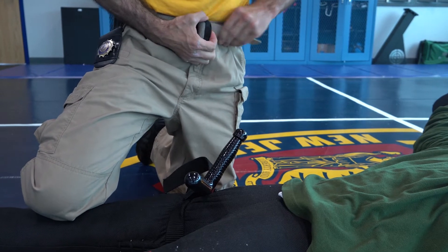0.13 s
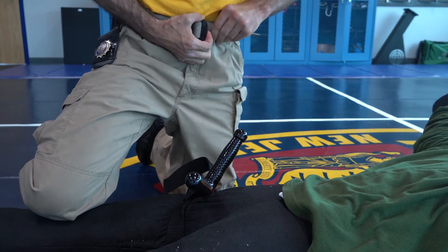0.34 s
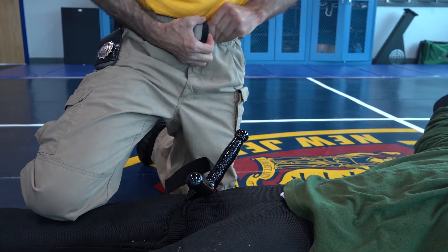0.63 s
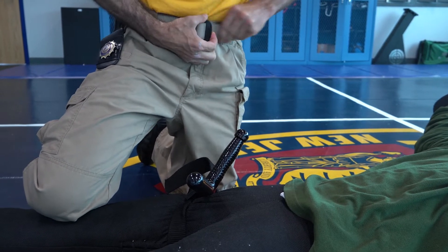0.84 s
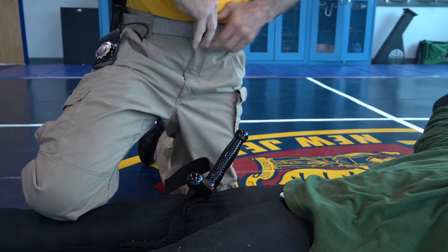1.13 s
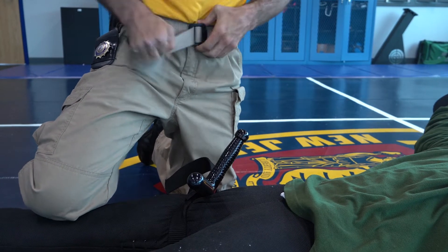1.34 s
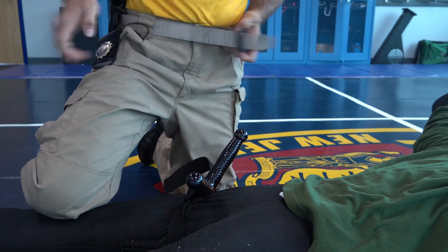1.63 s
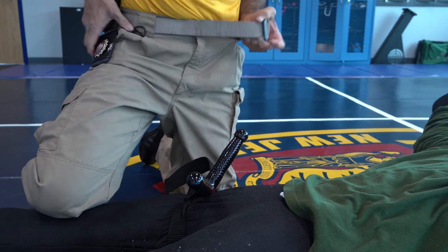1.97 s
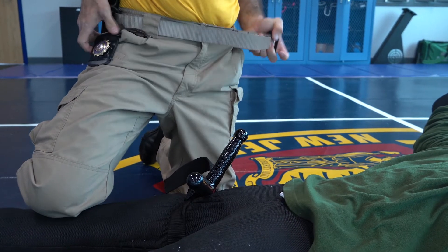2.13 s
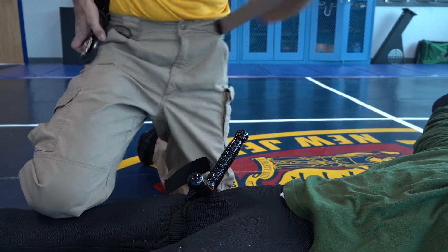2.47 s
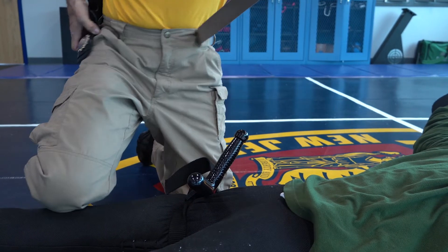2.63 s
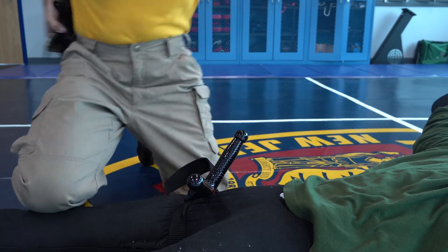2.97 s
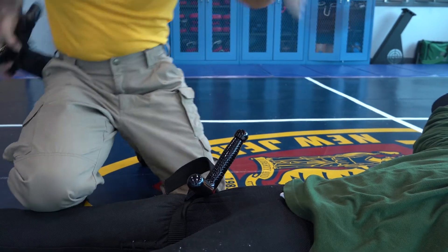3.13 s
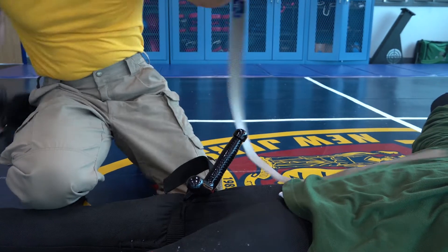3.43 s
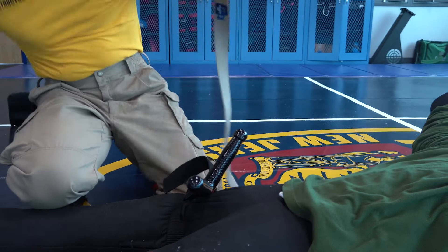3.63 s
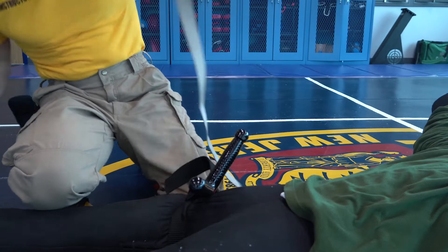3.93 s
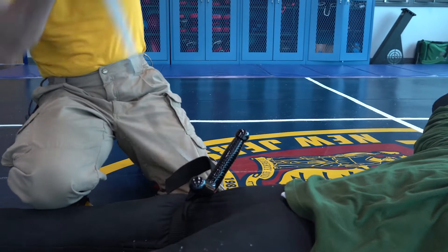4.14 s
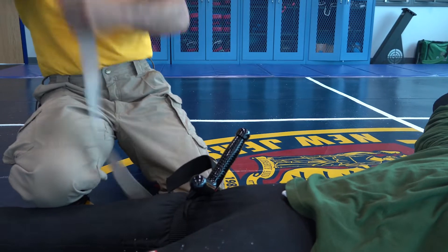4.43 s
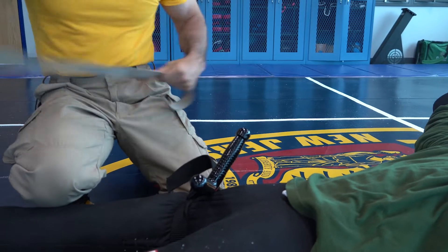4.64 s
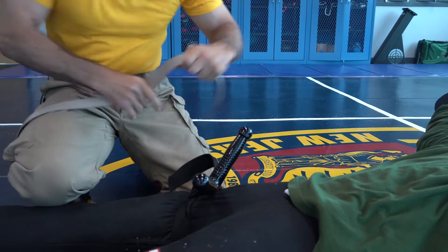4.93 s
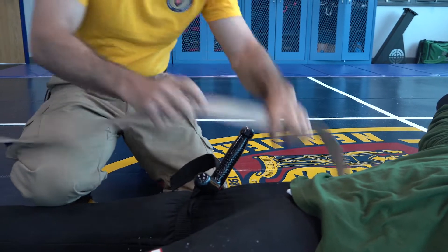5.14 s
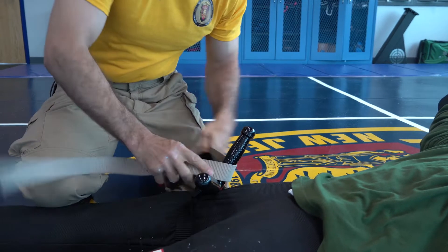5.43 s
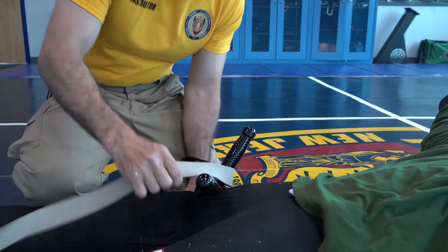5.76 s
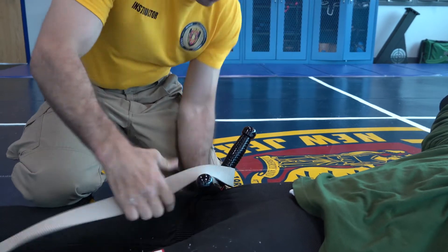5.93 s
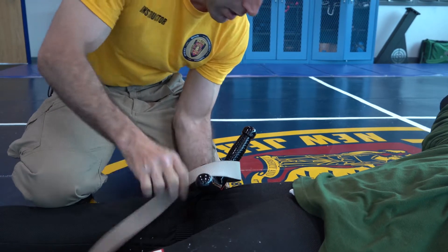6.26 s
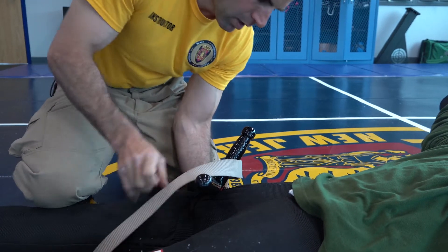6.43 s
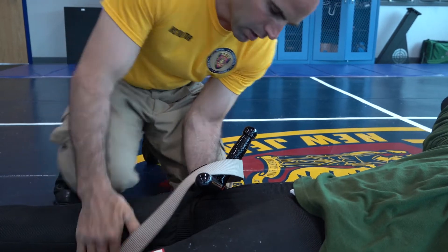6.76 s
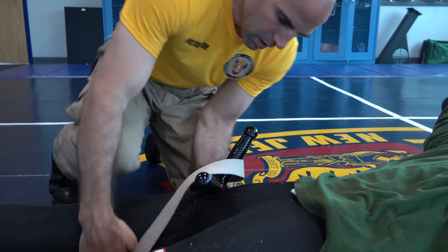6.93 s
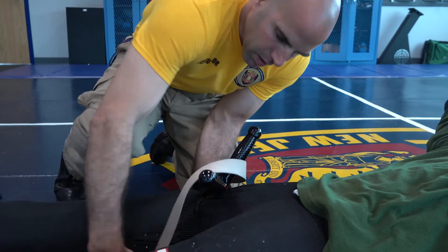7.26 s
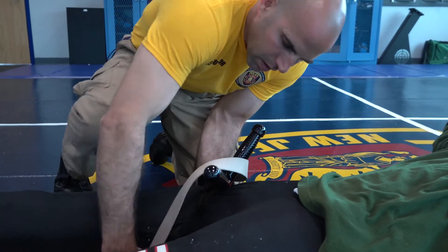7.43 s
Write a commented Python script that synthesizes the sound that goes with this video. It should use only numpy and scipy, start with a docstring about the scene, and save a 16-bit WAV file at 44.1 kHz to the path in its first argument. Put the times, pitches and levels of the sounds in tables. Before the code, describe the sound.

In a hall with a quiet ventilation rumble, clothing rustles and a latch clicks open, heard from close by. A webbing belt zips out through trouser loops in one fast, rasping pull, the loudest moment, and its tip briefly stutters. The loose strap and buckle then tap and slap at uneven intervals, while fabric brushes and scuffs as the belt is laid over a leg.

```python
"""Belt pulled off in a large hall

One microphone, close to a kneeling person who unbuckles a ribbed webbing belt, whips it out through
the trouser loops and lays it over a leg. Ribs pluck the loops and buzz; cloth fibres catch and let go
in rustles and scuffs; buckle and strap tick and slap. From farther off come a short, faint echo
and the rumble of the ventilation."""
import sys
import numpy as np
from scipy import signal
from scipy.fft import rfft, irfft
from scipy.io import wavfile

SR = 44100
rng = np.random.default_rng(int(sys.argv[2]) if len(sys.argv) > 2 else 0)


def store_wav(level_fs):
    """Save 16-bit WAV to argv[1]."""
    pcm = np.round(np.clip(np.atleast_2d(level_fs), -1, 1) * 32767)
    wavfile.write(sys.argv[1], SR, pcm.T.astype(np.int16))


N = 334851

# the belt running through the loops: t/s, rib rate/Hz, level/dB
BELT_RUN = [(2.32, 430, -42), (2.345, 470, -24), (2.37, 590, -16.5), (2.388, 700, -16), (2.41, 590, -19),
            (2.42, 750, -22), (2.436, 650, -20), (2.452, 705, -19), (2.475, 712, -19), (2.488, 630, -15),
            (2.507, 770, -28), (2.54, 775, -36)]
# the loose end following, slowing down: t/s, rib rate/Hz, level/dB
LOOSE_END = [(2.54, 1070, -29), (2.58, 1040, -31), (2.62, 910, -32), (2.71, 860, -39)]
# a thinner whine where the strap runs faster over a hip loop: t/s, rib rate/Hz, level/dB
HIP_WHINE = [(2.31, 1000, -34), (2.345, 1500, -30), (2.4, 2200, -35)]
# harmonics of the belt's buzz: multiple, relative level/dB
RIB_HARMONICS = [(1, 2), (2, -2), (3, -10.5), (4, -17), (5, -11)]
# harmonics of the loose end's buzz: multiple, relative level/dB
LOOSE_END_HARMONICS = [(1, -3), (2, -5.5), (3, -3), (4, -18.5)]

# ticks and slaps of buckle and strap: t/s, peak level/dB, body f/Hz, relative snap level/dB
TICKS = [(0.066, -17, 2400, 11), (0.263, -29.5, 1400, 3), (0.8572, -16, 705, 7), (0.8655, -15.5, 1400, -12),
         (0.8766, -27, 1570, -24), (1.2544, -5, 760, -1), (1.3003, -3.5, 1700, 9), (1.353, -13, 770, 3.5),
         (1.583, -18, 527, 2.5), (1.6248, -22.5, 583, -18), (1.638, -14.5, 2830, -5),
         (1.6422, -13.5, 2770, -19), (1.675, -13, 3360, -8), (1.6817, -14, 1630, -28),
         (1.7667, -19.5, 1180, -36), (1.781, -19, 1220, -2), (2.01, -21.5, 1590, -8),
         (2.2487, -19.5, 1320, -5), (2.4375, 3, 635, 1.5), (2.534, -5, 1110, -24), (2.6915, -10, 714, 0),
         (3.221, -22.5, 556, 0), (3.294, -27, 1320, -6), (3.4178, -15.5, 236, -16), (3.4287, -14.5, 453, 1),
         (3.539, -24, 2170, -20), (3.6766, -5, 9600, -17), (3.6793, -16, 222, -30),
         (3.6843, -1.5, 940, 8.5), (3.7098, -10, 8000, -10), (3.7229, -8.5, 865, -7),
         (3.7275, -5.5, 5300, 15), (3.867, -20, 3000, 9), (4.1767, -21, 2500, -13),
         (4.2118, -17.5, 2150, -3), (4.233, -7, 1550, -22), (4.235, 0, 1300, -14), (4.379, -18, 3000, -25),
         (4.7135, -13.5, 730, -1), (4.86, -8, 2860, -30), (4.8602, -9.5, 680, -26), (5.3058, -4.5, 1630, 1),
         (5.3076, -18, 1600, -4), (5.5513, -5.5, 434, 0.5), (5.8987, -15.5, 480, -1),
         (5.9165, -22, 3180, -19), (5.9402, -22, 3400, -15), (6.0313, -8.5, 940, -21),
         (6.0994, -21.5, 1050, -15), (6.1587, -26.5, 3560, 1), (6.2359, -11, 730, -16),
         (6.2898, -4.5, 373, -7), (6.301, -12, 685, -24), (6.519, -22.5, 920, -2),
         (6.878, -18.5, 890, -3.5), (6.901, -23, 3000, -6), (6.947, -19, 1990, -21),
         (6.913, -19, 1800, -15), (6.976, -9, 1230, -5), (7.166, -25.5, 696, -17), (7.186, -27, 1390, -7)]
BODY_WIDTH_HZ, BODY_WIDTH_SHARE = 190, .16   # a tick's bandwidth: a base plus a share of its pitch
# the stiff tip stuttering over a seam, in two runs: t/s, relative level/dB
TIP_SLIPS = [(2.051, -6), (2.0578, 3.5), (2.077, -6), (2.0849, 0), (2.088, 4), (2.098, -14), (2.109, -2),
             (2.128, -7), (2.146, -0.5), (2.8072, 0), (2.8176, -2), (2.8285, 0), (2.8386, 1), (2.848, 2),
             (2.8608, 1.5), (2.8772, 1)]
# modes of the belt tip: f/Hz, level/dB, T60/s
TIP_MODES = [(217, -28.5, 0.087), (322, -29, 0.019), (1610, -35.5, 0.05)]
SCRATCH_DB, SCRATCH_DECAY_S, SCRATCH_BAND_HZ = -30, 0.0037, (700, 3000)
# the latch rattling as it lets go: t/s, relative level/dB
LATCH_HITS = [(1.2243, -4), (1.2272, -3), (1.2803, -3), (1.2838, -2), (1.2872, 1), (1.2907, 4)]
# modes of the latch: f/Hz, level/dB, T60/s
LATCH_MODES = [(1100, -11, .016), (2700, -9, .007), (4600, -10, .005)]
# faint pings of the loose buckle: t/s, relative level/dB
BUCKLE_PINGS = [(1.803, 2), (1.827, 4), (1.891, -1), (3.57, 3)]
# modes of the buckle: f/Hz, level/dB, T60/s
BUCKLE_MODES = [(10300, -44, .03), (11050, -43, .035), (14900, -46, .04)]

# spectrum of the coarse weave's rasp: f/Hz, relative level/dB
RASP_SPECTRUM = [(480, -1), (900, -1), (1200, 1.5), (1480, 0), (1640, 4.5), (1800, -8)]
# spectrum of the strap's swish: f/Hz, relative level/dB
SWISH_SPECTRUM = [(1900, -10), (2500, -4.5), (3200, -6.5), (3900, -4.5), (4900, -12)]
# spectrum of the fine fibres' hiss: f/Hz, relative level/dB
HISS_SPECTRUM = [(5300, -5.5), (5800, -2.5), (7000, -7), (8000, -4), (9900, -4), (13000, -11),
                 (15300, -11.5)]
# spectrum of the heavy folds: f/Hz, relative level/dB
FOLD_SPECTRUM = [(110, -9.5), (200, -7), (340, -11.5), (600, -12.5)]
# cloth that never rests: t/s, rasp level/dB
FIDGET = [(0, -56.5), (.65, -63), (1.0, -54.5), (1.9, -49.5), (2.22, -56.5), (2.75, -43), (3.1, -54),
          (3.6, -47.5), (4.15, -54), (4.3, -46.5), (5.0, -48.5), (5.25, -54), (5.9, -55), (6.48, -57),
          (6.8, -44), (7.2, -56), (7.59, -42)]
# the belt's drag on the cloth as it is drawn: t/s, rasp level/dB
DRAG = [(2.27, -49), (2.345, -25.5), (2.5, -25), (2.56, -29.5), (2.64, -35), (2.7, -38), (2.85, -78)]
FIDGET_SWISH_DB, FIDGET_HISS_DB, DRAG_SWISH_DB, DRAG_HISS_DB = -1.5, -2.5, -3, -6.5   # re rasp
# long soft strokes of strap and sleeve: loudest t/s, rise/s, fade/s, rasp/dB, swish/dB, hiss/dB
STROKES = [(1.562, 0.041, 0.078, -49, -43, -43.5), (1.808, 0.14, 0.02, -42, -43.5, -54),
           (3.691, 0.0067, 0.21, -37.5, -40, -31.5), (4.33, 0.078, 0.14, -56, -49, -57),
           (4.54, 0.19, 0.19, -47, -37, -43), (4.802, 0.015, 0.2, -68, -47, -46),
           (4.9, .04, 0.21, -46.5, -50, -64), (5.15, 0.17, 0.1, -47, -44, -42.5),
           (5.738, 0.26, 0.2, -39.5, -48, -50.5), (6.022, 0.048, 0.26, -46, -50.5, -51.5),
           (6.682, 0.18, 0.19, -39.5, -42, -37), (6.99, 0.17, 0.27, -39, -40.5, -43.5),
           (7.38, 0.22, 0.22, -43, -49.5, -50.5)]
# short scuffs and creaks of strap on cloth: t/s, length/s, rasp/dB, swish/dB, folds/dB
SCUFFS = [(0.059, 0.029, -43, -58, -72), (0.501, 0.031, -43, -48.5, -65), (0.867, 0.04, -28, -36, -44),
          (1.21, 0.088, -28, -30.5, -44), (1.616, 0.079, -35.5, -47.5, -46.5),
          (2.058, 0.093, -40.5, -48.5, -33), (2.655, 0.0069, -25, -33.5, -32.5),
          (3.216, 0.014, -42, -49, -33), (3.349, 0.011, -46, -54, -34.5),
          (3.416, 0.0088, -29, -37.5, -21.5), (3.532, 0.0072, -41, -46, -30),
          (3.668, 0.086, -35, -40, -35.5), (4.228, 0.038, -38, -35.5, -38), (4.434, 0.0073, -54, -60, -32),
          (4.855, 0.048, -38, -42, -36), (5.135, 0.032, -57, -50, -35.5), (5.19, 0.0091, -67, -52, -36.5),
          (5.296, 0.028, -60, -44, -28.5), (5.426, 0.004, -37, -39.5, -42),
          (5.495, 0.0068, -42, -39.5, -60), (5.546, 0.014, -42, -40, -22.5),
          (5.894, 0.043, -40.5, -50, -34.5), (6.286, 0.013, -35, -31, -30.5),
          (6.554, 0.018, -33.5, -34, -33.5)]
SCUFF_RISE_S, SCUFF_FALL_S, SCUFF_HISS_DB = 0.0057, 0.011, -5.5   # hiss re swish
SETTLE_DB, SETTLE_LENGTHS = -15, 3.3   # cloth settling: level, time constant in scuff lengths

# spectrum of the ventilation's broad hush: f/Hz, relative level/dB
HUSH_SPECTRUM = [(105, -12), (130, 5.5), (185, 4.5), (260, 3), (292, -3), (1600, -16.5), (10000, -49),
                 (13800, -46)]
# spectrum of its deep rumble: f/Hz, relative level/dB
RUMBLE_SPECTRUM = [(6, 9), (18, 6), (30, -8), (46, 0), (57, -5), (70, 0), (80, -10), (98, -20)]
# spectrum of the thrum, two low hall resonances: f/Hz, relative level/dB
THRUM_SPECTRUM = [(40, -16), (47, 0), (57, -14), (69, -1), (80, -20)]
# swells of the thrum: loudest t/s, rise/s, fade/s, level/dB
THRUM_SWELLS = [(4.44, 0.058, 0.17, -41), (4.76, 0.11, 0.75, -27), (5.22, 0.061, 0.1, -31),
                (6.18, 0.063, 0.2, -32.5)]
# a faint, brief tone in the hall air: loudest t/s, rise/s, fade/s, f/Hz, level/dB
HUM = (0.4, 0, 0.2, 189, -38.5)
HUSH_DB, RUMBLE_DB, RUMBLE_WANDER_DB = -46.5, -36, 2
HALL_T60_S, HALL_DB, WALL_CUT_HZ = .3, -19, 6000
CUTOFF_HZ = 15750


def belt_pull():
    """Close to the microphone the belt buzzes out through the loops, its loose end trailing."""
    run = rib_buzz(BELT_RUN, RIB_HARMONICS)
    loose_end = rib_buzz(LOOSE_END, LOOSE_END_HARMONICS)
    return run + loose_end + rib_buzz(HIP_WHINE, RIB_HARMONICS[:1])


def rib_buzz(run, harmonics):
    """Each rib plucks a loop; speed and grip waver, so every harmonic comes and goes."""
    t, buzz = np.arange(N) / SR, np.zeros(N)
    rate_hz, level_db = in_time(run)
    phase = 2 * np.pi * np.cumsum(rate_hz * (1 + .022 * drift(60))) / SR
    for k, db in harmonics:
        grip_db = (2 + .6 * k) * drift(40)
        buzz += amp(db + grip_db) * np.sin(k * phase + .2 * k * drift(150))
    moving = np.clip(np.minimum(t - run[0][0], run[-1][0] - t) / 0.0057, 0, 1)
    return np.sqrt(2) * amp(level_db) * moving * buzz


def ticks():
    """Buckle and strap strike: a sharp touch and brief chatter ring a damped body, with a bright snap."""
    out, t = np.zeros(N + SR), np.arange(SR // 20) / SR
    bright = signal.butter(1, [2400, 9000], "band", fs=SR, output="sos")
    for s, peak_db, hz, snap_db in TICKS:
        noise = rng.standard_normal(len(t))
        touch = 2.2 * np.sqrt(SR / hz) * (np.arange(len(t)) == 8)
        chatter = noise * t / (t + 0.00014) * np.exp(-t / (0.0014 + 2.9 / hz))   # longer for low bodies
        width_hz = BODY_WIDTH_HZ + BODY_WIDTH_SHARE * hz
        body = signal.lfilter(*signal.iirpeak(hz, hz / width_hz, fs=SR), touch + chatter)
        soft = signal.butter(2, min(hz * 4.1, SR / 2.2), fs=SR, output="sos")
        body = signal.sosfilt(soft, body)   # soft things carry little treble
        snap = signal.sosfilt(bright, noise * np.exp(-t / 0.0014))
        tick = body / np.abs(body).max() + amp(snap_db - 3.0) * snap / np.abs(snap).max()
        at = round(s * SR)
        out[at:at + len(t)] += amp(peak_db) * tick / np.abs(signal.hilbert(tick)).max()
    return out[:N]


def buckle():
    """The latch rattles open and the loose buckle pings, each ringing in its own modes."""
    rattle = struck(LATCH_HITS, LATCH_MODES, scatter_db=1)
    return rattle + struck(BUCKLE_PINGS, BUCKLE_MODES, scatter_db=3)


def tip_stutter():
    """The stiff tip stutters over a seam, ringing and dragging a short scratch at each slip."""
    s, db = np.transpose(TIP_SLIPS)
    slips = np.zeros(N)
    slips[np.round(s * SR).astype(int)] = amp(db + SCRATCH_DB)
    envelope = signal.lfilter([1], [1, -np.exp(-1 / (SCRATCH_DECAY_S * SR))], slips + 1e-18)
    band = signal.butter(1, SCRATCH_BAND_HZ, "band", fs=SR, output="sos")
    grit = rms_one(signal.sosfilt(band, rng.standard_normal(N)))
    return envelope * grit + struck(TIP_SLIPS, TIP_MODES, scatter_db=2)


def struck(hits, modes, scatter_db):
    """Every hit sets each mode ringing with a strength of its own."""
    out, t = np.zeros(N + SR), np.arange(SR // 10) / SR
    for s, hit_db in hits:
        at = round(s * SR)
        for hz, mode_db, t60 in modes:
            start_db = hit_db + mode_db + scatter_db * rng.standard_normal()
            out[at:at + len(t)] += amp(start_db - 60 * t / t60) * np.sin(2 * np.pi * hz * t)
    return out[:N]


def cloth():
    """Clothing at close range: weave rasps, the strap swishes, fine fibres hiss, heavy folds rumble."""
    weave = wandering_contact(friction(900, spread_db=4.0, smooth=1.4, clump_db=1.0), depth_db=3.0)
    fibres = friction(3100, spread_db=0.5, smooth=0.93, clump_db=1.5)
    folds = friction(150, spread_db=3.0, smooth=1.2, clump_db=1.5)
    layers = [colour(weave, RASP_SPECTRUM), colour(weave, SWISH_SPECTRUM),
              colour(fibres, HISS_SPECTRUM), colour(folds, FOLD_SPECTRUM)]
    sustained = np.vstack([stroking(), np.zeros(N)])   # folds sound only in scuffs
    return np.sum(np.hypot(sustained, scuffing()) * layers, axis=0)


def friction(catches_per_s, spread_db, smooth, clump_db):
    """Fibres catch and let go: uneven clicks in clumps over a smooth hiss."""
    sizes = amp(spread_db * np.minimum(rng.exponential(1, N), 5)) * rng.choice([-1, 1], N)
    caught = rng.random(N) < catches_per_s / SR
    crackle = rms_one(sizes * caught) + smooth * rng.standard_normal(N)
    return crackle * amp(clump_db * drift(30.0))


def wandering_contact(x, depth_db):
    """The contact wanders over the weave: each third octave swells and fades on its own."""
    edges_hz, out = 400 * 2 ** (np.arange(13) / 3), np.zeros(N)
    for k in range(12):
        band = signal.butter(2, edges_hz[k:k + 2], "band", fs=SR, output="sos")
        out += signal.sosfilt(band, x) * amp(depth_db * drift(13.5)) * (-1) ** k
    return out


def stroking():
    """Gains of rasp, swish and hiss: restless cloth, the belt's drag and long strokes add in power."""
    t = np.arange(N) / SR
    fidget = amp(in_time(FIDGET)[0] + np.c_[[0, FIDGET_SWISH_DB, FIDGET_HISS_DB]])
    drawing = (t > DRAG[0][0]) * (t < DRAG[-1][0])
    drag = amp(in_time(DRAG)[0] + np.c_[[0, DRAG_SWISH_DB, DRAG_HISS_DB]]) * drawing
    stroke_power = sum((amp(np.c_[db]) * swell(s, rise, fade)) ** 2 for s, rise, fade, *db in STROKES)
    return np.sqrt(fidget ** 2 + drag ** 2 + stroke_power)


def scuffing():
    """Gains of rasp, swish, hiss and folds: a scuff starts fast and stops short, then the cloth settles."""
    t, gains = np.arange(N) / SR, np.zeros((4, N))
    for s, length, rasp_db, swish_db, fold_db in SCUFFS:
        rise = np.clip((t - s) / SCUFF_RISE_S, 0, 1)
        after = np.clip(t - s - length, 0, None)
        settle = amp(SETTLE_DB) * np.exp(-after / (SETTLE_LENGTHS * length))
        fall = np.maximum(np.exp(-after / SCUFF_FALL_S), settle)
        levels = amp(np.c_[[rasp_db, swish_db, swish_db + SCUFF_HISS_DB, fold_db]])
        gains = np.maximum(gains, levels * rise * fall)
    return gains


def hall_echo(x):
    """Diffuse reflections reach the microphone after the floor bounce, dulled by the walls."""
    t = np.arange(SR) / SR
    tail = rng.standard_normal(SR) * amp(-60 * t / HALL_T60_S) * (t > .012)
    walls = signal.butter(1, [250, WALL_CUT_HZ], "band", fs=SR, output="sos")
    tail = signal.sosfilt(walls, tail)
    return signal.fftconvolve(x, tail / np.linalg.norm(tail))[:N]


def ventilation():
    """Air in the background: a steady hush, a wandering rumble, a swelling thrum and a passing hum."""
    hush = amp(HUSH_DB) * colour(rng.standard_normal(N), HUSH_SPECTRUM)
    wander_db = RUMBLE_WANDER_DB * drift(8.0)
    rumble = amp(RUMBLE_DB + wander_db) * colour(rng.standard_normal(N), RUMBLE_SPECTRUM)
    s, rise, fade, hz, db = HUM
    hum = amp(db) * swell(s, rise, fade) * np.sin(2 * np.pi * hz * np.arange(N) / SR + drift(4.0))
    thrum_power = sum((amp(db) * swell(s, rise, fade)) ** 2 for s, rise, fade, db in THRUM_SWELLS)
    thrum = np.sqrt(thrum_power) * colour(rng.standard_normal(N), THRUM_SPECTRUM)
    return hush + rumble + thrum + hum


def colour(x, spectrum):
    """Shapes a signal with a spectrum that falls away steeply past its ends; rms 1."""
    hz, db = np.transpose(spectrum)
    log_hz = np.log(np.arange(1, N // 2 + 2) * SR / N)
    outside = np.maximum(np.log(hz[0]) - log_hz, 0) + np.maximum(log_hz - np.log(hz[-1]), 0)
    gain = amp(np.interp(log_hz, np.log(hz), db) - 45 * outside)
    return rms_one(irfft(rfft(x) * gain, N))


def swell(s, rise, fade):
    """A raised-cosine rise to 1 at time s, then a fade to silence."""
    t = np.arange(N) / SR - s
    return np.cos(np.pi / 2 * np.clip(np.where(t < 0, t / rise, t / fade), -1, 1)) ** 2


def drift(rate_hz):
    """A smooth random wander; rms 1."""
    pole = np.exp(-2 * np.pi * rate_hz / SR)
    return rms_one(signal.lfilter([1], [1, -2 * pole, pole * pole], rng.standard_normal(N + SR))[SR:])


def in_time(rows):
    """Each column after the time joined by straight lines, one value a sample."""
    s, *columns = np.transpose(rows)
    return [np.interp(np.arange(N) / SR, s, column) for column in columns]


def amp(db):
    """Decibels to gain."""
    return 10 ** (np.asarray(db) / 20)


def rms_one(x):
    """Scaled to unit rms."""
    return x / np.sqrt(np.mean(x ** 2) + 1e-20)


def scene():
    """At the microphone, in mono: belt and cloth close by, the hall's echo and ventilation behind."""
    close = cloth() + belt_pull() + ticks() + tip_stutter() + buckle()
    return (close + amp(HALL_DB) * hall_echo(close) + ventilation())[None]


def record(dry):
    """The loudest peaks clip at full scale, then a steep low-pass cuts the top treble."""
    top_cut = signal.cheby2(12, 70, CUTOFF_HZ, fs=SR, output="sos")
    return signal.sosfilt(top_cut, np.clip(dry, -1, 1))


dry = scene()
out = record(dry)
store_wav(out)
```